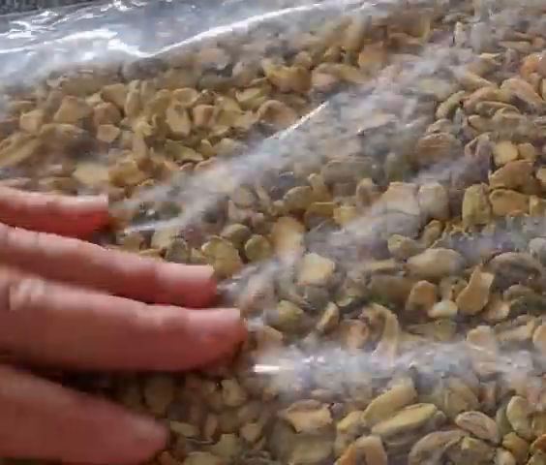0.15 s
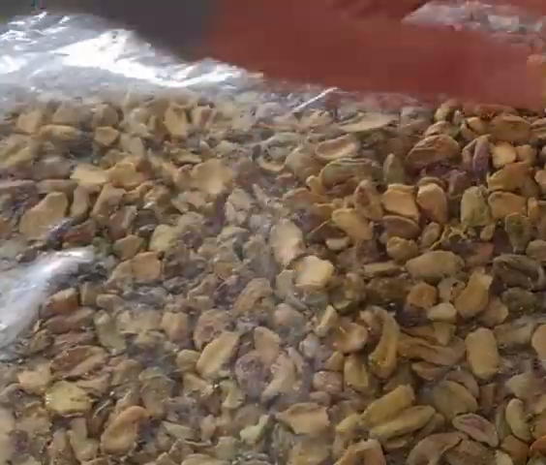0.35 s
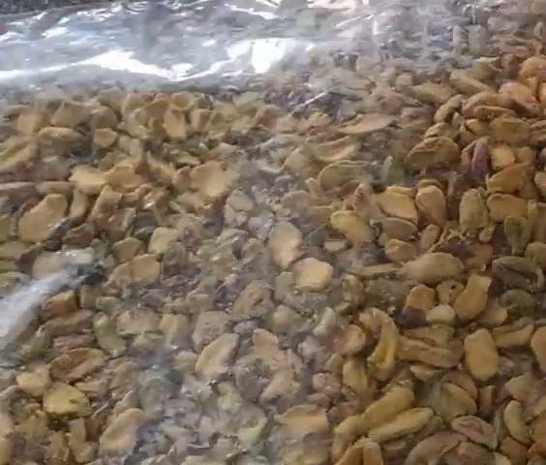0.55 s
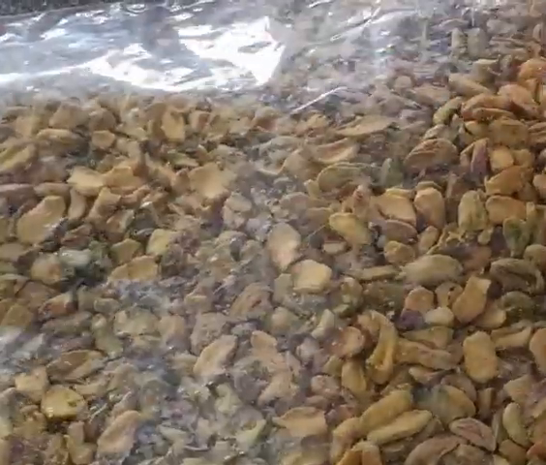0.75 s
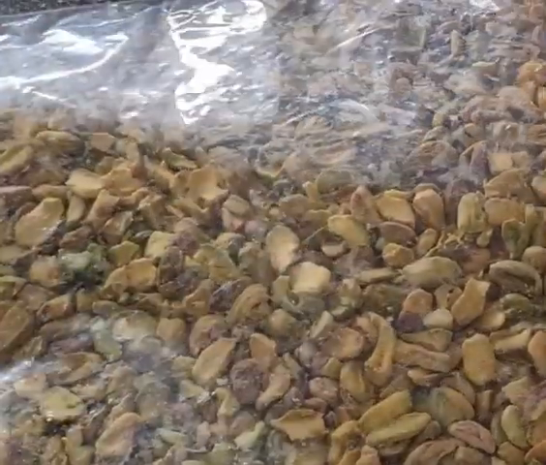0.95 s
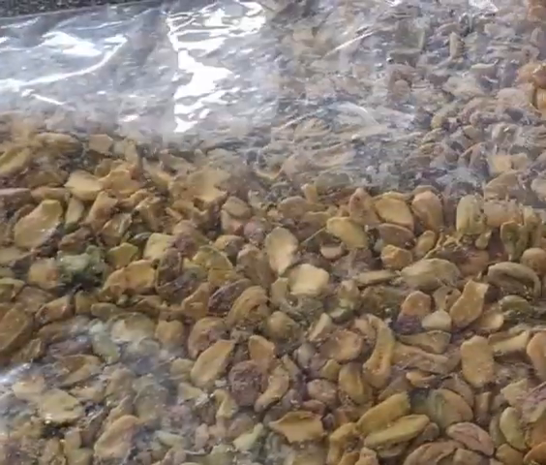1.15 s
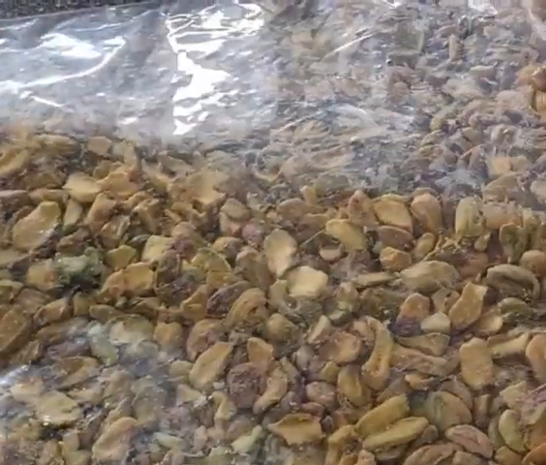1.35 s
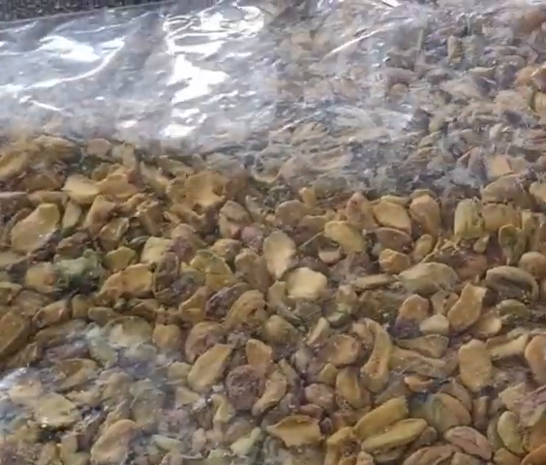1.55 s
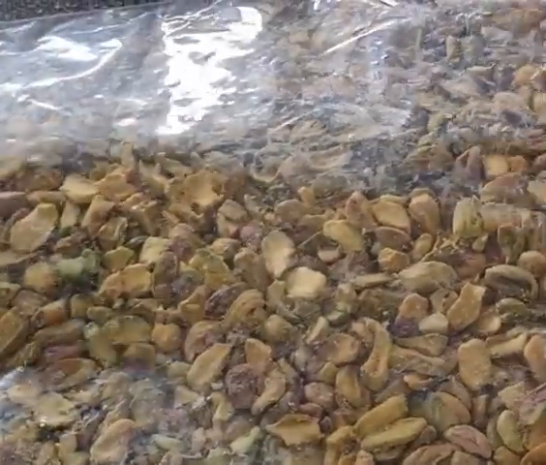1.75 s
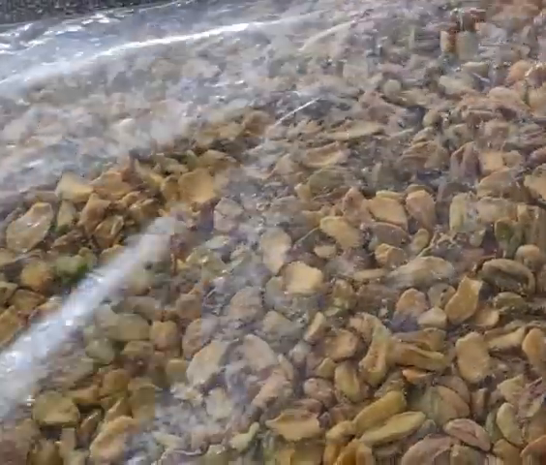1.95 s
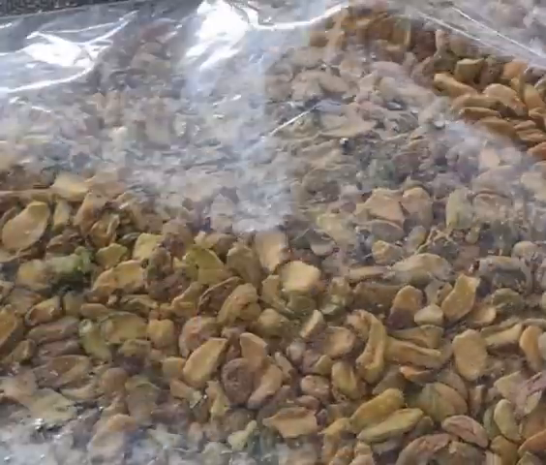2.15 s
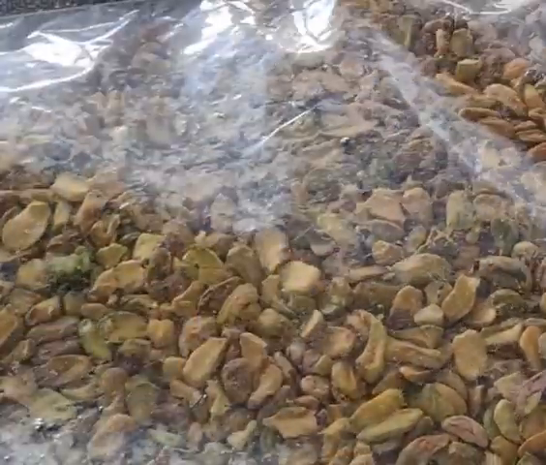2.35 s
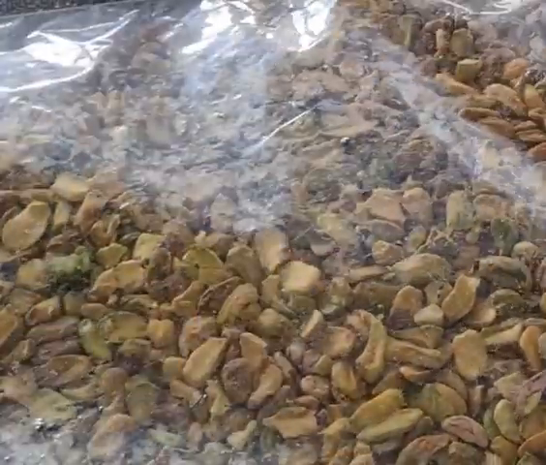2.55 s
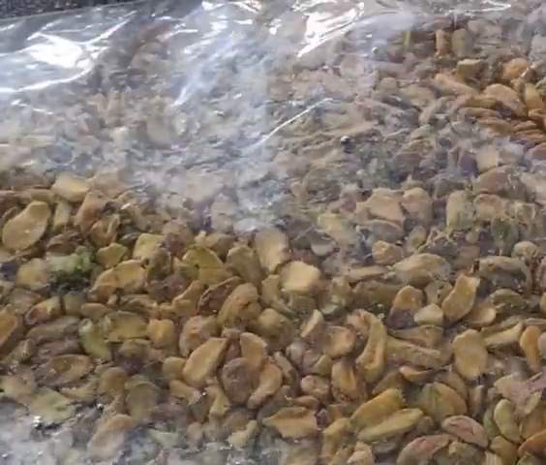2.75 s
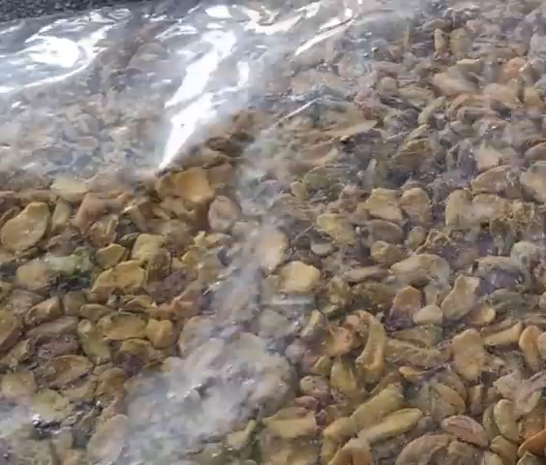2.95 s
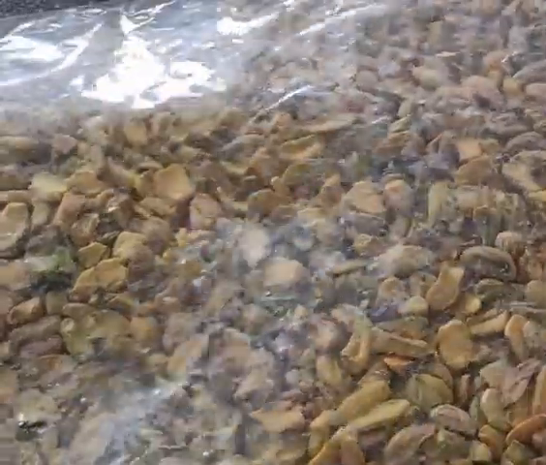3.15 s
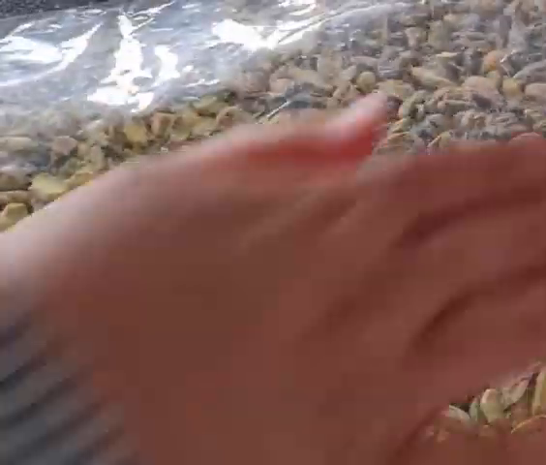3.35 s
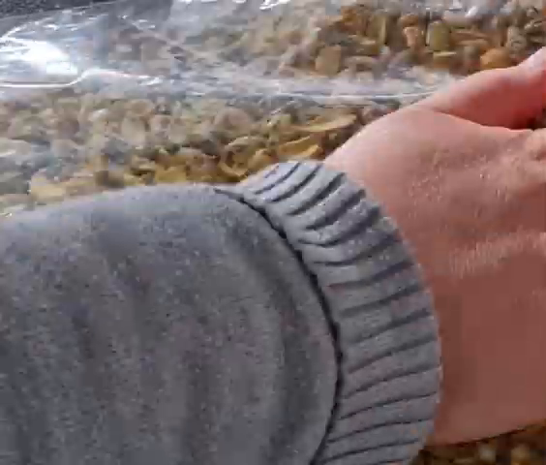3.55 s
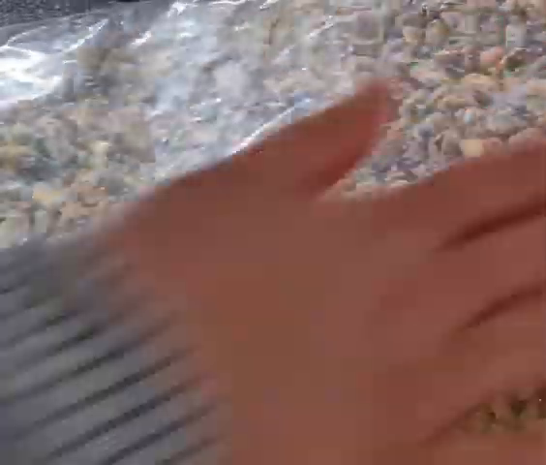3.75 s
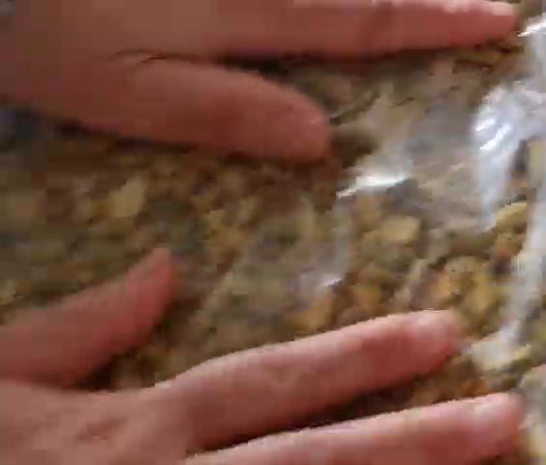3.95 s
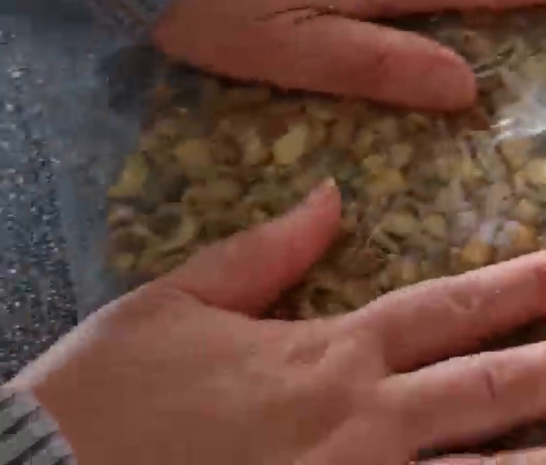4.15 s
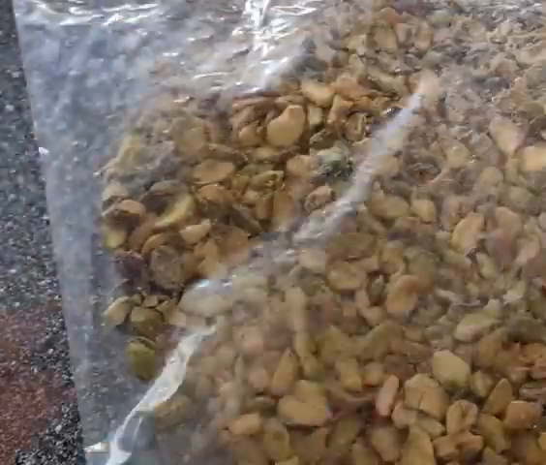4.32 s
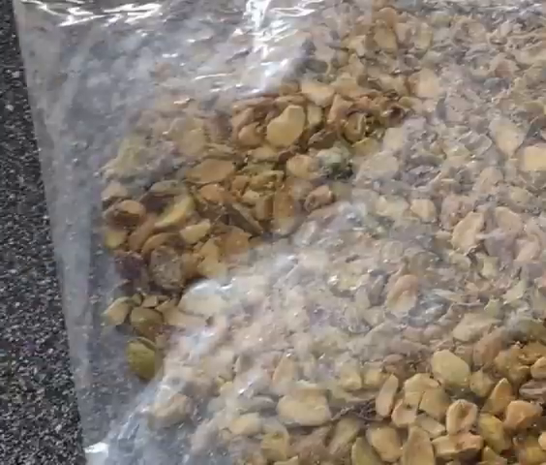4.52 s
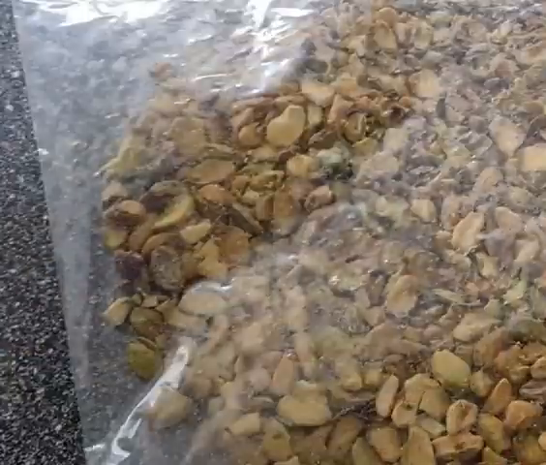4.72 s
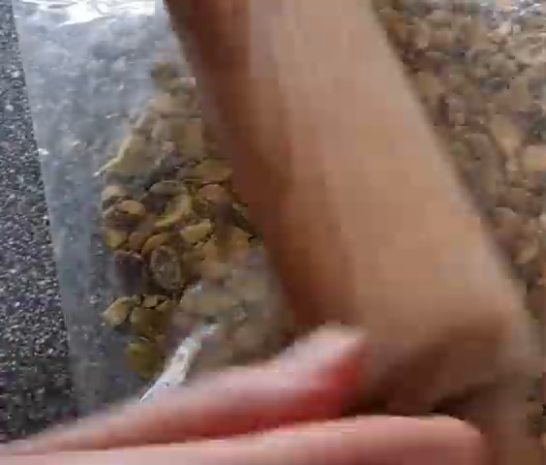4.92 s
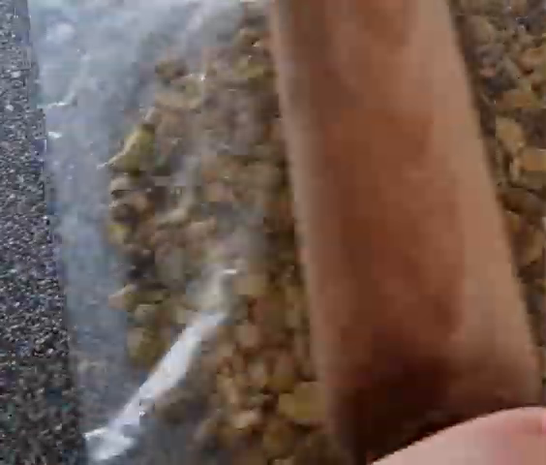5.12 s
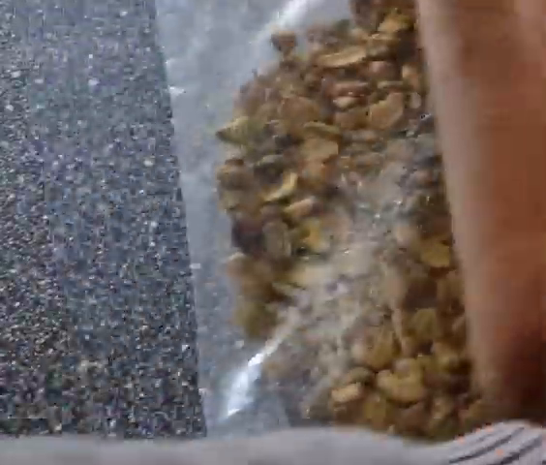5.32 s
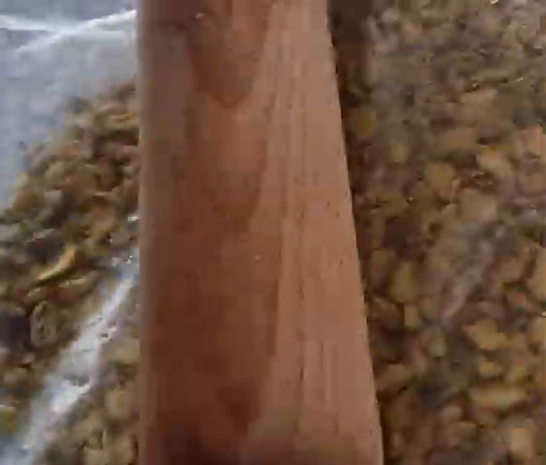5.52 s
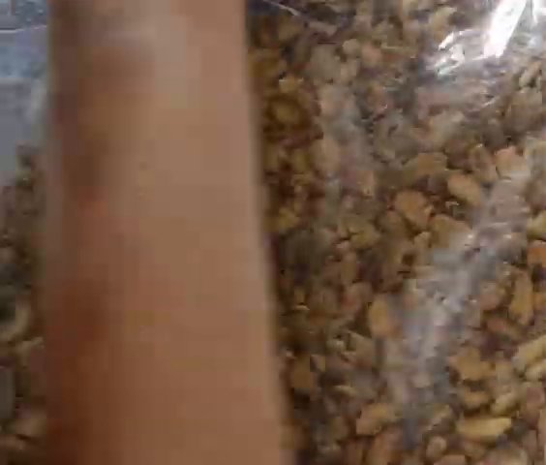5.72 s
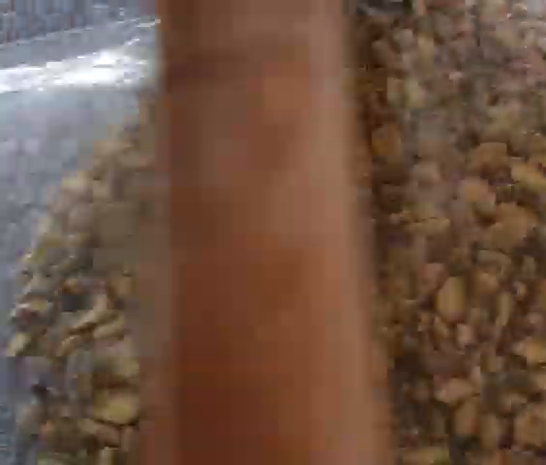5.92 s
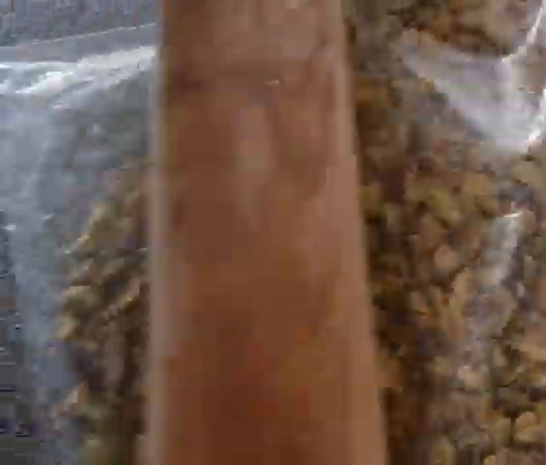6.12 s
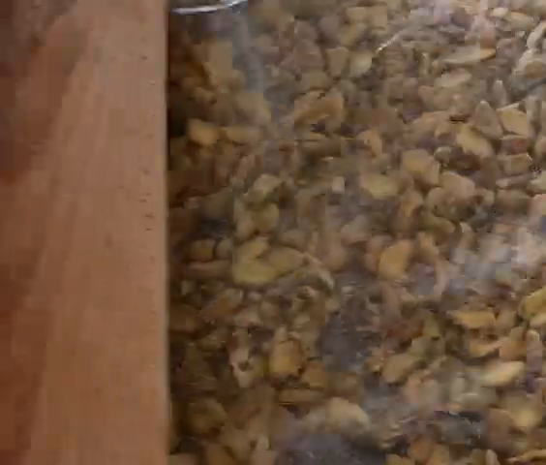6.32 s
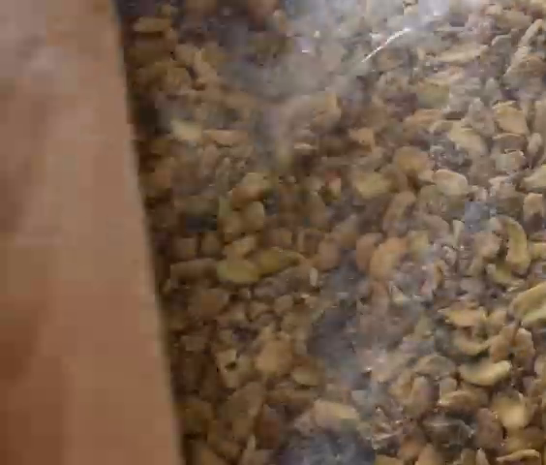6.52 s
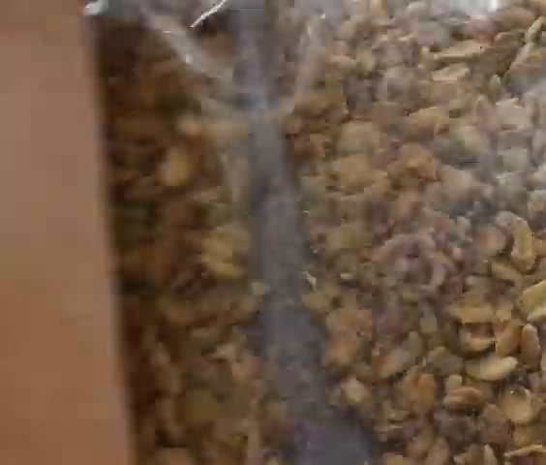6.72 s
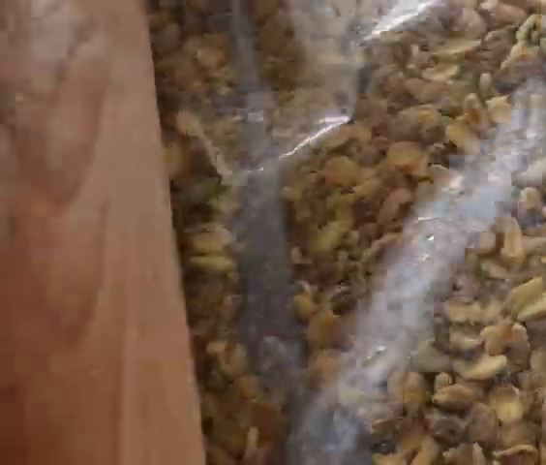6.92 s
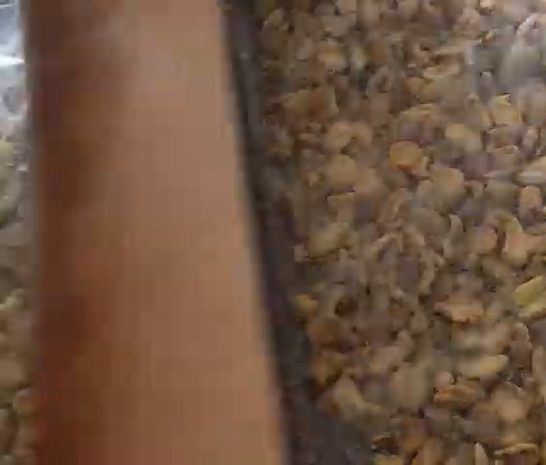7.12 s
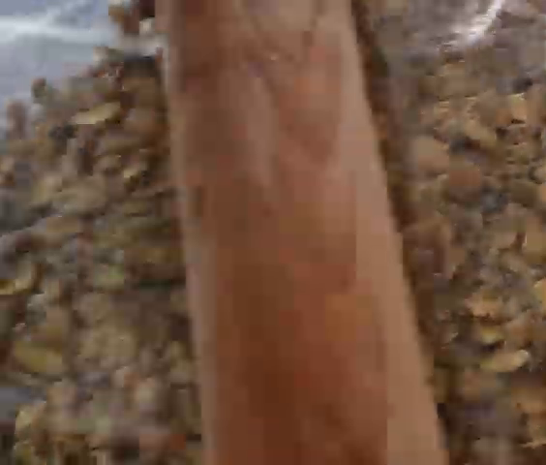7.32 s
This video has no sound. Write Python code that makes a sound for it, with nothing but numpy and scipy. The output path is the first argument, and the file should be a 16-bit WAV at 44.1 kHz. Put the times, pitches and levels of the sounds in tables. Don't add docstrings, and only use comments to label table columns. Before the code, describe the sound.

Hands crinkle and pat a plastic bag of nuts, then a wooden rolling pin crushes them with crunching cracks, film snaps and dull counter thuds.

```python
import sys
import numpy as np
from scipy import signal
from scipy.fft import rfft, irfft, next_fast_len
from scipy.io import wavfile
from scipy.ndimage import uniform_filter1d, map_coordinates

SR = 44100
rng = np.random.default_rng(int(sys.argv[2]) if len(sys.argv) > 2 else 0)


def volts_from_db(level):
    exponent = np.asarray(level, float) / 20
    return 10 ** exponent


def master_out(mix):
    frames = np.transpose(np.atleast_2d(mix))
    ceiling = np.clip(frames, -1, 1)
    pcm = np.round(ceiling * 32767).astype(np.int16)
    wavfile.write(sys.argv[1], SR, pcm)


N = 325017

# f/Hz, density/dB
HISS_SPECTRUM = [(30, -37), (100, -6), (300, -5), (470, -8), (580, -8.5), (900, -13.5), (15900, -20),
                 (16400, -64)]
# t/s, length/s, level/dB, start f/Hz, end f/Hz
SLIDES = [
    (5.542, 0.1, -37, 439, 405),
    (5.552, .09, -53, 1890, 1870),
    (6.89, .045, -39, 2760, 2760),
    (7.262, 0.042, -60.5, 3300, 3240),
]
# t/s, peak level/dB, brightness/dB, handle/dB
KNOCKS = [
    (4.722, -32, -12.5, -25),
    (5.19, -30, -20, -24),
    (5.266, -19.5, -32, -0.5),
    (5.282, -21, -37, -6),
]
# f/Hz, level/dB, t60/s
PIN_MODES = [(700, -5, 0.15), (640, 1, 0.055), (780, 1, 0.06), (1350, -21, 0.53), (2230, -4, 0.17),
             (2300, 9, 0.1), (3320, -3, 0.11), (4670, -19.5, 0.15)]
# f/Hz, level/dB, share of the thud's t60
COUNTER_MODES = [(43, -4.5, 0.45), (62, 2, 0.69), (120.4, 0, 1.1), (175, -1.5, 0.4), (237.5, 0.5, 0.75),
                 (405, -2, 0.39), (315, -3, 0.45)]
# t/s, peak level/dB, main f/Hz, upper modes/dB
PALMS = [(0.001, -44.5, 103, -9.5), (0.189, -49, 133, -13), (0.297, -46.5, 85, -10.5),
         (0.512, -42, 118, -8), (0.534, -41, 108, -8), (0.594, -47.5, 112, -6), (2.061, -55.5, 118, -28),
         (3.268, -47, 88.6, -33), (3.561, -42.5, 74, -17), (3.618, -38.5, 83, -15.5),
         (3.886, -43.5, 79, -16), (4.038, -39.5, 53.3, -32), (4.414, -31.5, 117.5, -13),
         (4.537, -46.5, 50.6, -17), (4.711, -43.5, 103, -5.5), (4.836, -41, 118, -5.5)]
# t/s, peak level/dB, main f/Hz, upper modes/dB, t60/s
DROPS = [(5.11, -19, 122, -8, .18), (5.264, -22, 80.5, -14, 0.16), (5.368, -23, 126.5, -7.5, 0.12),
         (5.479, -32.5, 123, -3, .13), (5.801, -35.5, 67.5, -20, .2), (5.925, -29, 58, -7, 0.13),
         (6.127, -19, 78.7, -17, 0.14), (6.398, -31, 78, -13.5, 0.18), (6.61, -14.5, 56, -19.5, .14),
         (6.66, -22.5, 107.5, -9.5, .12), (6.751, -44.5, 99.8, -1.5, 0.099), (6.902, -17, 77.4, -16, .13),
         (7.031, -27, 115, -11, 0.12), (7.17, -34.5, 54.7, -19, 0.14), (7.293, -22, 68, -17.5, 0.13)]
# t/s, peak level/dB, f/Hz, left over right/dB
POPS = [(0.96, -35.5, 8550, 16), (1.023, -46, 7100, 16), (1.1367, -40.5, 8800, -4),
        (1.4472, -35, 10700, 15), (1.5929, -36, 12700, 4), (1.6386, -49.5, 10000, 13),
        (1.676, -28.5, 13600, 5), (1.755, -32, 10300, 3), (2.02, -32, 9600, 12), (2.0285, -33, 9300, 13),
        (2.2061, -34.0, 8800, 10), (2.9277, -16.5, 11000, 15), (2.9449, -43, 8300, 10),
        (3.1466, -48, 5200, 14), (3.3603, -37.5, 5300, 6), (3.569, -39, 6160, 7), (3.62, -28.5, 8450, 10),
        (4.0494, -42, 9600, 3), (4.1334, -47, 7800, 0), (4.2643, -55, 6200, 7), (5.383, -24, 12200, 5),
        (5.462, -26.5, 10700, 3), (5.9455, -26.5, 12600, 0.5), (6.0375, -31, 11400, 3),
        (6.3403, -28, 10300, 8), (6.3944, -44.5, 7900, 12), (6.783, -32, 5300, 4),
        (7.0496, -23.5, 6900, -5), (7.124, -34, 10700, 2), (7.139, -25, 9300, 3)]
# f/Hz, level/dB
RUMBLE_SPECTRUM = [(20, -120), (28, 3), (55, -8), (85, 2.5), (120, -0.5), (175, -6.5), (238, -14),
                   (300, 3.5), (400, -120)]
NUT_SPECTRUM = [(150, -120), (260, -4), (400, -2), (480, -5.5), (700, -4), (1000, -5), (1400, -9),
                (2200, -34)]
FILM_SPECTRUM = [(800, -105), (1400, -6.5), (2300, -3), (3100, -3.5), (4200, -4), (5500, -5), (6500, -51)]
FIZZ_SPECTRUM = [(4800, -43), (5700, 0.5), (8000, -2), (11000, -6), (15500, -8), (16200, -51)]
# t/s, level/dB
WEIGHT = [(0.0, -71.5), (0.68, -65), (1.42, -78.5), (2.11, -67.5), (2.61, -72), (3.96, -69), (4.41, -81),
          (4.58, -61), (4.82, -61.5), (5.11, -67.5), (5.27, -42), (5.36, -53), (5.58, -56), (5.81, -56.5),
          (6.01, -48), (6.14, -66), (6.65, -55.5), (7.37, -57.5)]
# peak t/s, crinkle level/dB, rise/s, fall/s (both over 20 dB), fizz over crinkle/dB
STROKES = [(0.0, -44, 0.096, 0.077, -10), (.105, -48.5, 0.061, 0.051, -2.5), (.42, -61.5, 0.042, 0.036, -4),
           (.69, -53.5, 0.043, 0.12, -6), (.96, -65.5, 0.049, 0.05, 1), (1.05, -53.5, 0.078, 0.046, -6),
           (1.195, -65.5, 0.033, 0.27, -12), (1.345, -62.5, 0.037, 0.024, -4),
           (1.39, -57.5, 0.032, 0.06, -7), (1.72, -55.5, 0.084, 0.25, -7), (1.89, -56, 0.1, 0.093, -15),
           (2.421, -56, 0.032, 0.12, -21), (2.47, -58.5, 0.065, .1, -15), (2.62, -72, .03, 0.034, -8),
           (2.609, -78.5, 0.029, 0.056, 14), (2.88, -57, 0.049, .05, -22), (4.169, -46, 0.12, 0.078, -3.5),
           (4.27, -57.5, 0.068, 0.14, -9), (.21, -54, 0.07, 0.15, -7), (.319, -61.5, 0.036, 0.31, -6),
           (.624, -55, 0.029, 0.092, -8), (.868, -55.5, 0.076, 0.057, -6), (1.107, -47.5, 0.08, 0.075, -11),
           (1.45, -56, 0.04, 0.058, -10), (1.6, -57, 0.053, 0.13, -4), (2.04, -57.5, 0.088, 0.17, 0.5),
           (2.21, -50.5, 0.055, 0.15, -10), (2.524, -68, 0.12, 0.04, -6),
           (2.938, -53.5, 0.033, 0.072, -3.5), (3.149, -57, 0.079, 0.26, -6.5),
           (3.367, -55, 0.066, 0.065, -5), (3.6, -58, 0.24, 0.092, -13), (3.637, -41, 0.015, 0.046, -15.5),
           (3.74, -50, 0.12, 0.095, -7), (3.877, -47.5, 0.031, 0.053, -12), (4.046, -40, 0.024, 0.089, -6),
           (4.1, -46.5, 0.051, 0.28, -0.5), (4.434, -50, 0.15, 0.06, -11), (4.62, -69, 0.15, 0.25, 6.5),
           (4.69, -53, 0.04, 0.11, -28), (5.03, -63, .05, .04, -8), (5.062, -53, 0.02, 0.025, -17)]
# peak t/s, crinkle level/dB, rise/s, fall/s (both over 20 dB), fizz over crinkle/dB
ROLLS = [(5.289, -42.5, 0.13, 0.086, -6.5), (5.52, -40, 0.042, 0.21, -7.5), (5.6, -54, 0.24, 0.082, 4.5),
         (5.735, -50, 0.098, 0.11, -22), (5.16, -55.5, 0.093, 0.2, 1.5), (5.385, -40.5, 0.11, 0.074, -2),
         (5.779, -47.5, 0.091, 0.073, -9.5), (5.85, -58, 0.036, 0.033, -4), (6.05, -69, 0.095, 0.055, -9),
         (6.32, -42, 0.05, 0.075, -9.5), (6.47, -45, 0.048, 0.079, -3), (6.699, -28.5, 0.043, 0.025, -8),
         (6.72, -39, 0.041, 0.035, 0.5), (6.785, -42.5, 0.062, 0.062, -6.5),
         (7.19, -57.5, 0.087, 0.069, -3), (5.95, -44.5, .08, 0.2, -3), (6.2, -46, 0.38, 0.15, -10),
         (6.261, -36.5, 0.046, 0.083, -8), (6.428, -34.5, 0.039, 0.069, -7.5),
         (6.885, -47.5, 0.015, 0.015, -20), (6.695, -39, 0.078, 0.088, -20), (6.87, -51, 0.037, 0.13, -12),
         (6.918, -58, 0.1, 0.16, -12), (7.055, -29.5, 0.016, 0.035, -11), (7.11, -50.5, 0.13, 0.12, -14),
         (7.313, -49.5, 0.023, 0.15, -10.5)]
# t/s, peak level/dB, t60/s, ringing f/Hz
FOLDS = [(0.0907, -38.5, 0.11, 2090), (0.194, -32, 0.088, 2650), (0.3016, -31, 0.093, 3330),
         (0.61, -32, 0.084, 2156), (0.847, -47.5, 0.11, 3760), (1.046, -43.5, 0.087, 745),
         (1.0877, -35, 0.06, 2200), (1.2355, -50.5, 0.083, 4810), (1.581, -35.5, 0.096, 4590),
         (1.644, -47, 0.12, 2410), (1.712, -43.5, 0.13, 591), (1.752, -45.5, 0.099, 2530),
         (1.872, -42, 0.084, 2200), (1.967, -50.5, 0.19, 3650), (2.0133, -43.5, 0.11, 2840),
         (2.027, -43, 0.24, 3380), (2.081, -46, 0.078, 2930), (2.1924, -39, 0.21, 3200),
         (2.252, -41.5, 0.088, 1594), (2.5226, -47.5, 0.12, 578), (2.9163, -46, 0.062, 3870),
         (3.127, -47, 0.069, 3080), (3.145, -46.5, 0.053, 2330), (3.212, -43.5, 0.11, 3990),
         (0.734, -49.5, 0.054, 4700), (0.785, -55, 0.1, 3560), (.872, -53, 0.11, 3470),
         (0.951, -54, 0.17, 4700),
         (3.619, -33.5, 0.12, 1830), (3.63, -33.5, 0.068, 1490), (4.016, -42, 0.18, 1670),
        (4.025, -35, 0.055, 1750), (4.03, -27.5, 0.083, 1764), (4.361, -42, 0.14, 2590),
        (4.421, -43.5, 0.11, 3370), (4.5294, -41.5, 0.15, 1890),]
# t/s, peak level/dB, t60/s, ringing f/Hz
CRUSHES = [(5.1181, -27.5, 0.093, 538), (5.164, -36.5, 0.17, 2670), (5.2685, -35.5, 0.19, 680),
           (5.3547, -37, 0.39, 2220), (5.3719, -24, 0.1, 1520), (5.459, -33, 0.12, 684),
           (5.491, -22.5, 0.11, 1943), (5.844, -40.5, 0.095, 1585), (5.907, -33, 0.15, 2840),
           (5.9384, -31, 0.12, 705), (6.046, -32.5, 0.12, 1700), (6.1317, -24, 0.095, 558),
           (6.1757, -33.5, 0.093, 2240), (6.2438, -20.5, 0.088, 814), (6.4023, -41, 0.11, 2300),
           (6.4096, -27, 0.16, 3700), (6.5129, -31, 0.098, 2730), (6.6557, -25, 0.34, 1523),
           (6.683, -20.5, 0.14, 3020), (6.7518, -27.5, 0.1, 416), (6.913, -28.5, 0.097, 2780),
           (7.0406, -24, 0.17, 1508), (7.173, -41, 0.14, 988), (7.288, -41, 0.15, 3380),
           (7.2984, -28.5, 0.1, 2225)]
# t/s, peak level/dB, t60/s, ringing f/Hz
SPLITS = [(1.4235, -37.5, 0.065, 4320), (1.548, -56.5, 0.095, 3040), (1.6638, -39, 0.072, 760),
          (1.816, -50, 0.094, 890), (2.1575, -50, 0.12, 4540), (2.315, -58.5, 0.06, 2500),
          (2.595, -49, 0.062, 3490), (2.9437, -39, 0.027, 3000), (3.342, -43, 0.072, 4500),
          (3.853, -35, 0.069, 2300), (4.722, -56, 0.085, 790), (5.113, -30, 0.1, 1510),
          (5.984, -32, 0.13, 868), (6.604, -28.5, 0.12, 586), (6.9006, -23.5, 0.12, 1150),
          (7.0217, -28.5, 0.16, 402)]
# t/s, peak level/dB, t60/s
SNAPS = [(0.1994, -35, 0.062), (0.311, -40.5, 0.054), (0.608, -35, 0.056), (0.787, -50.5, 0.051),
         (0.853, -43, 0.042), (0.9602, -40, 0.044), (1.0221, -54, 0.043), (1.048, -41, 0.056),
         (1.0975, -34, 0.052), (1.134, -42.5, 0.036), (1.1933, -51, 0.047), (1.2456, -54, 0.027),
         (1.425, -43, 0.06), (1.4464, -40.5, 0.031), (1.591, -40, 0.04), (1.6016, -40, 0.028),
         (1.6372, -54, 0.05), (1.6733, -38, 0.046), (1.7075, -43, 0.07), (1.7537, -33.5, 0.033),
         (1.7684, -43, 0.034), (1.8761, -50, 0.094), (1.975, -37.5, 0.05), (2.0185, -40, 0.061),
         (2.0274, -39, 0.057), (2.0903, -35, 0.045), (2.1908, -34.5, 0.04), (2.2044, -36.5, 0.043),
         (2.213, -36, 0.035), (2.4233, -54, 0.04), (2.455, -43, 0.032), (2.5334, -46, 0.046),
         (2.603, -50, 0.034), (2.879, -55, 0.045), (2.928, -32, 0.05), (2.9434, -47, 0.039),
         (3.1457, -52, 0.039), (3.219, -42.5, 0.047), (3.3588, -65, 0.05), (3.5678, -45.5, 0.038),
         (3.6197, -39, 0.084), (3.859, -39.5, 0.064), (4.0248, -40, 0.086), (4.036, -30, 0.066),
         (4.0484, -43, 0.05), (4.3585, -49, 0.05), (4.4274, -44, 0.046), (4.537, -39, 0.059),
         (4.993, -55.5, 0.056),
         (5.3804, -30.5, 0.041), (5.461, -27.5, 0.051), (5.5013, -27.5, 0.042), (5.806, -45.5, 0.05),
             (5.913, -33.5, 0.06), (5.9314, -41, 0.05), (5.9439, -39, 0.067), (6.0362, -44, 0.06),
             (6.0478, -36.5, 0.032), (6.133, -34.5, 0.055), (6.17, -43, 0.05), (6.1863, -35, 0.069),
             (6.2003, -35, 0.033), (6.2477, -35, 0.061), (6.3049, -30.5, 0.032), (6.34, -32, 0.027),
             (6.3934, -50, 0.05), (6.4107, -34, 0.058), (6.422, -28, 0.079), (6.6069, -44, 0.067),
             (6.782, -37, 0.059), (6.8214, -46, 0.026), (6.9127, -38.5, 0.056), (7.0439, -31.5, 0.06),
             (7.049, -30.5, 0.065), (7.1214, -42, 0.04), (7.1394, -29.5, 0.038), (7.3003, -37, 0.051)]
# t/s, peak level/dB, t60/s
TEARS = [
    (6.665, -44, .1),
    (6.684, -17.5, 0.11),
]

THUD_T60_S, HARD_SHORTENS = 0.096, 0.028
CHOKE = 1.573
DEEP_PER_DB = 0.22
POP_CYCLES, POP_LIFT_DB = 11.8, 7
STROKE_BEND, FIZZ_SWING, RATTLE_SWING = 1.15, 1, 0.97
LIGHT_DB, RATTLE_DB, RATTLE_PER_DB = -62, -3.5, 0.58
BREAK_DB, BREAK_PER_DB, BREAK_PER_OCTAVE_DB = -5, 0.367, -2
FOLD_RISE_S, CRUSH_RISE_S, SPLIT_RISE_S = 0.047, 0.041, 0.016
SHELL_TILT_DB = -9.5
LEFT_FIZZ_DB = 2


def unit(x):
    return x / np.sqrt(np.mean(x ** 2) + 1e-20)


def wobble(rate):
    knots = rng.standard_normal(int(N * rate / SR) + 4)
    return map_coordinates(knots, [np.arange(N) * rate / SR])


def coloured(x, points):
    m = next_fast_len(N + 8192)
    f, level = np.transpose(points)
    gain = volts_from_db(np.interp(np.log(np.fft.rfftfreq(m, 1 / SR) + 1), np.log(f), level))
    return unit(irfft(rfft(x, m) * gain, m)[..., :N])


def add_at(out, s, sound):
    start = round(s * SR)
    out[:, start:start + sound.shape[1]] += sound


def ringing(hz, db, t60, attack_s, t, choke=1):
    lead = rng.choice([-1, 1]) * min(0.21 + hz / 700, .8) * np.array([[1], [-1]])
    start = (1 - np.exp(-t / attack_s)) ** 2
    fade = volts_from_db(db - 60 * (t / max(t60, .02)) ** choke)
    return fade * start * np.sin(2 * np.pi * hz * t + lead)


def room_hiss():
    return volts_from_db(-81) * coloured(rng.standard_normal((2, N)), HISS_SPECTRUM)


def pin_slides():
    out = np.zeros((2, N))
    for s, length, db, from_hz, to_hz in SLIDES:
        u = np.arange(round(length * SR)) / (length * SR)
        phase = 2 * np.pi * np.cumsum(from_hz + (to_hz - from_hz) * u) / SR
        slow = uniform_filter1d(rng.standard_normal((2, len(u))), size=170, axis=1)
        add_at(out, s, volts_from_db(db) * np.sin(np.pi * u) ** 0.53 * unit(slow) * np.sin(phase))
    return out


def pin_knocks():
    out, t = np.zeros((2, N + SR)), np.arange(SR // 3) / SR
    for s, db, bright_db, handle_db in KNOCKS:
        lifts = (0, 0, 0, *[bright_db] * 4, handle_db)
        for (hz, level, t60), lift in zip(PIN_MODES, lifts):
            add_at(out, s, ringing(hz, db + level + lift, t60, 0.0032, t))
    return out[:, :N]


def counter_thuds():
    out, t = np.zeros((2, N + SR)), np.arange(SR // 3) / SR
    palms = [(*row, THUD_T60_S * np.exp(-HARD_SHORTENS * row[-1])) for row in PALMS]
    for s, db, hz, upper_db, t60 in palms + DROPS:
        ring = ringing(hz, db - 4.0, t60, 0.0039, t, CHOKE)
        for k, (mode_hz, level, share) in enumerate(COUNTER_MODES):
            if k > 2:
                lift, life = upper_db + 3.0, min(t60, THUD_T60_S) * 1.5
            else:
                lift, life = -1.5 + DEEP_PER_DB * db, t60
            mode_db = db + level + lift + rng.normal(0, 1.2)
            ring += ringing(mode_hz * rng.normal(1, 0.03), mode_db, life * share, 0.0044, t, CHOKE)
        add_at(out, s, ring)
    return out[:, :N]


def pops():
    out, t = np.zeros((2, N + SR)), np.arange(SR // 400) / SR
    for s, db, hz, left_db in POPS:
        fade = volts_from_db(db + POP_LIFT_DB - 60 * t * hz / POP_CYCLES)
        ring = fade * (1 - np.exp(-t * hz * 2.0)) * np.sin(2 * np.pi * hz * t)
        add_at(out, s, ring * volts_from_db(np.minimum([[left_db], [-left_db]], 0)))
    return out[:, :N]


def weight_db(s):
    return np.interp(s, *np.transpose(WEIGHT))


def cracks():
    s, db, t60, hz = np.transpose(FOLDS + CRUSHES + SPLITS)
    weight_share = BREAK_PER_DB * (weight_db(s) - LIGHT_DB)
    nut_db = BREAK_DB + weight_share + BREAK_PER_OCTAVE_DB * np.log2(hz / 2000)
    return s, db, nut_db, t60, hz


def shells():
    out, t = np.zeros((2, N + SR)), np.arange(SR // 10) / SR
    rows = np.transpose(cracks())
    spread = rng.normal(0, 0.0699, (len(rows), 3))
    for (s, db, nut_db, t60, hz), detunes in zip(rows, spread):
        level = db - 10.5 + nut_db * (hz < 1400)
        for detune in (0, *detunes):
            add_at(out, s, ringing(hz * (1 + detune), level, min(0.88 * t60, .14), 0.00082, t))
    return out[:, :N]


def strokes():
    now, power = np.arange(0, N + 64, 64) / SR, 0
    for s, db, rise_s, fall_s, fizz_db in STROKES + ROLLS:
        away = np.where(now < s, (s - now) / max(rise_s, .01), (now - s) / max(fall_s, .01))
        fade_db = -20 * away ** STROKE_BEND
        rattle_db = RATTLE_DB + RATTLE_PER_DB * (weight_db(s) - LIGHT_DB)
        layers_db = [rattle_db + RATTLE_SWING * fade_db, fade_db, fizz_db + FIZZ_SWING * fade_db]
        power = power + volts_from_db(db + np.array(layers_db)) ** 2
    return [np.interp(np.arange(N) / SR, now, p) for p in power]


def shower(rows, rise_s, lead_db, lead_s, tick_db, tick_s, build):
    power, t = np.zeros((2, N + SR)), np.arange(-SR // 40, SR // 5) / SR
    tick = (t >= 0) * volts_from_db(tick_db - 60 * np.abs(t) / tick_s) ** 2
    sides = rng.normal(0, 0.88, (len(rows), 1))
    for (s, db, t60), side_db, rise in zip(rows, sides, np.broadcast_to(rise_s, len(rows))):
        swell = np.maximum(60 * t / rise, lead_db + 60 * t / lead_s * np.max(rise_s) / rise)
        peak_s = build * max(t60 - .05, .002)
        body = np.minimum(-7 * (1 - t / peak_s), -60 * (t - peak_s) / max(t60 - 4 * peak_s, .02))
        shape = volts_from_db(db + np.where(t < 0, swell - 7, body)) ** 2
        shape += volts_from_db(db) ** 2 * tick * min(0.058 / t60, 1.5) ** 4
        start = round(s * SR) + SR // 10 - SR // 40
        power[:, start:start + len(t)] += shape * volts_from_db(side_db * np.array([[1], [-1]])) ** 2
    return power[:, SR // 10:SR // 10 + N]


def crack_showers():
    s, db, nut_db, t60, _ = cracks()
    rise_s = np.where(s < CRUSHES[0][0], FOLD_RISE_S, CRUSH_RISE_S)
    rise_s[-len(SPLITS):] = SPLIT_RISE_S
    crack = shower(np.transpose([s + 0.00075, db - 5.5, t60]), rise_s=rise_s,
                   lead_db=-13, lead_s=0.071, tick_db=5.5, tick_s=0.019, build=0.059)
    nut = shower(np.transpose([s + 0.002, db + nut_db - 5.5, 1.026 * t60]), rise_s=rise_s,
                 lead_db=1.0, lead_s=0.049, tick_db=9.0, tick_s=0.017, build=0.052)
    s, db, _, upper_db = np.transpose(PALMS + [row[:-1] for row in DROPS])
    nut += shower(np.transpose([s + 0.0022, db + upper_db - 15.0, 0.13 + 0 * s]), rise_s=.01,
                  lead_db=-40, lead_s=.05, tick_db=-3, tick_s=.02, build=0.1)
    return crack, nut


def snap_showers():
    s, db, t60 = np.transpose(SNAPS + TEARS)
    return shower(np.transpose([s + 0.0015, db - 7.5, t60]), rise_s=0.0026,
                  lead_db=-36, lead_s=.05, tick_db=1.5, tick_s=0.0024, build=0.16)


def grit(points, alike, spiky_db, patchy_db, clump):
    shared, own = rng.standard_normal(N + 4), rng.standard_normal((2, N))
    shared = np.array([shared[4:], shared[:N]])
    z = signal.stft(np.sqrt(alike) * shared + np.sqrt(1 - alike) * own, nperseg=256)[2]
    field = uniform_filter1d(rng.standard_normal(z.shape[1:]), size=4, axis=0)
    field = uniform_filter1d(field, size=8, axis=1)
    cloud = signal.istft(z * volts_from_db(patchy_db * unit(field)), nperseg=256)[1][:, :N]
    return coloured(cloud * volts_from_db(spiky_db * clump), points)


def bag():
    now = np.arange(N) / SR
    rattle, crinkle, sizzle = [p * volts_from_db(-1.5 + 1.88 * wobble(45)) ** 2 for p in strokes()]
    crack, nut = crack_showers()
    snap = snap_showers()
    crushing = now > CRUSHES[0][0] - .03
    clump = wobble(350)

    rumble = grit(RUMBLE_SPECTRUM, alike=0.12, spiky_db=1.5, patchy_db=2.0, clump=clump)
    rumble *= volts_from_db(weight_db(now) + 1.2 * wobble(31)) * (crinkle / volts_from_db(LIGHT_DB) ** 2) ** 0.23

    nuts = grit(NUT_SPECTRUM, alike=0.21, spiky_db=-0.5, patchy_db=1.5, clump=clump)
    nuts *= np.sqrt(rattle + nut)

    film = grit(FILM_SPECTRUM, alike=0.16, spiky_db=0.5, patchy_db=2.5, clump=clump + 1.1 * wobble(1500))
    film *= np.sqrt(crinkle + crack * ~crushing + volts_from_db(-20.0) * snap)

    dull = [(hz, db + SHELL_TILT_DB * max(np.log2(hz / 2000), 0)) for hz, db in FILM_SPECTRUM]
    shell = grit(dull, alike=0.083, spiky_db=0.0, patchy_db=2.0, clump=clump + wobble(1500))
    shell *= np.sqrt(crack * crushing)

    fizz = grit(FIZZ_SPECTRUM, alike=0.061, spiky_db=1.5, patchy_db=2.0, clump=clump + 0.1 * wobble(2700))
    fizz *= np.sqrt(sizzle + snap) * volts_from_db(LEFT_FIZZ_DB * np.array([[.5], [-.5]]))
    return rumble + nuts + film + shell + fizz


def scene():
    return room_hiss() + pin_slides() + pin_knocks() + counter_thuds() + pops() + shells() + bag()


def roll_off(x):
    return signal.sosfilt(signal.butter(12, 16820, fs=SR, output="sos"), x)


def record(dry):
    m = next_fast_len(N)
    below = np.fft.rfftfreq(m, 1 / SR) < 16000
    mix = irfft(rfft(dry, m) * below, m)[:, :N]
    return roll_off(mix)


dry = scene()
out = record(dry)
master_out(out)
```